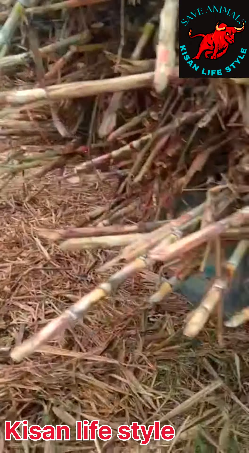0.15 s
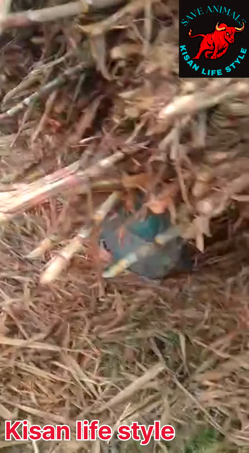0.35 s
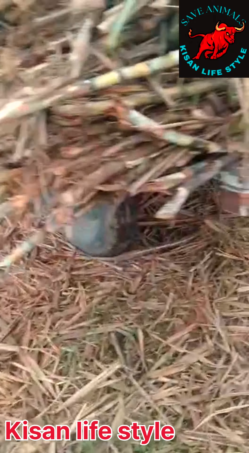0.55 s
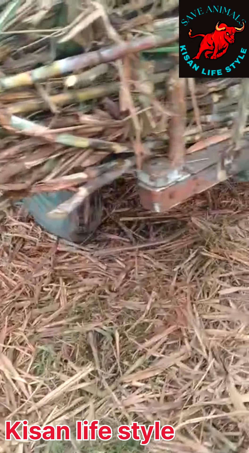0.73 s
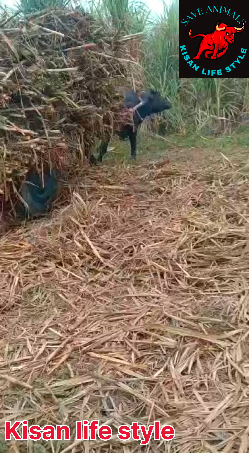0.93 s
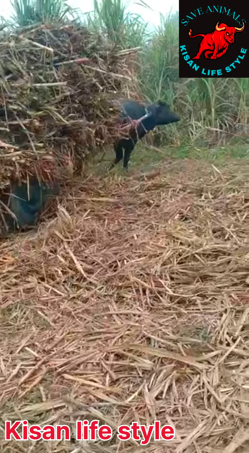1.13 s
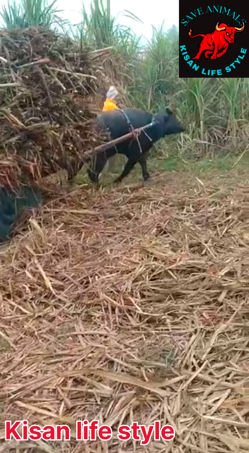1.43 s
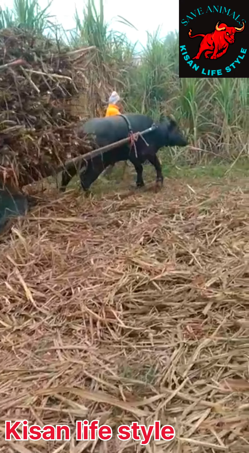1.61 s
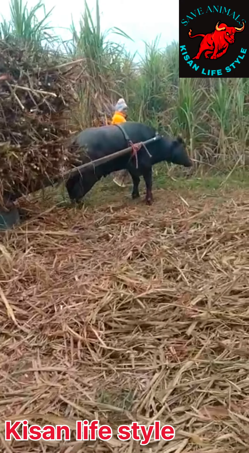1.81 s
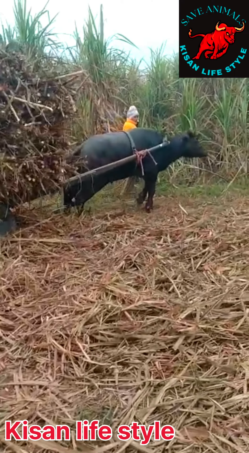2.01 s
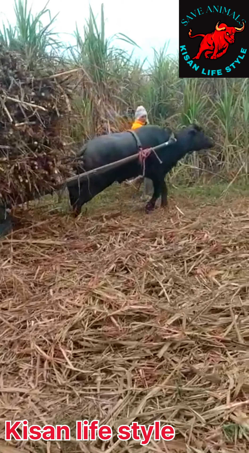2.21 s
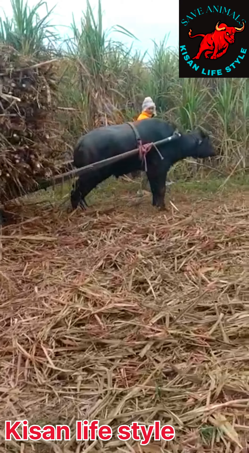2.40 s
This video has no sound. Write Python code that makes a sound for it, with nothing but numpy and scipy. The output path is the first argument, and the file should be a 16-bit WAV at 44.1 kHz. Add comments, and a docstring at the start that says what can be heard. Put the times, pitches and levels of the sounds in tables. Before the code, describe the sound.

Close mono pickup in open air without echo: crisp leaf litter rustles continuously, with a busy flurry of woody thumps and crunches early, a short lull past the middle, then snapping stalks and softer bumps.

```python
"""An open field covered in dry leaves: a loaded cane cart is drawn over it, close by.
Litter: grain noise, hissing and crackling, over a low noise rumble. Load shifts: damped sine thuds with
bursts of crushed-leaf grains. Stalk snaps: short woody and bright noise bursts. Slow crushes: grain
clumps of changing level. Cane rasps: noise bursts, each round one resonance."""
import sys
import numpy as np
from scipy.fft import rfft, irfft, next_fast_len
from scipy.io import wavfile
from scipy.ndimage import uniform_filter1d, map_coordinates

SR = 44100
rng = np.random.default_rng(int(sys.argv[2]) if len(sys.argv) > 2 else 0)


def to_wav(sig):
    """Store sig (one row per channel, or 1-D mono) as 16-bit WAV at the path in sys.argv[1].

    Samples outside -1..1 are clipped; the rate is SR.
    """
    pcm = np.clip(np.atleast_2d(sig), -1, 1) * 32767
    pcm = np.round(pcm).astype(np.int16)
    wavfile.write(sys.argv[1], SR, pcm.T)  # frames by channels


N = 112454

# Level curves. Each row: time in seconds, level in dB before the layer's gain and wobble.
HISS_LEVEL = [(0.0, -40.5), (0.44, -48.5), (0.6, -46), (0.68, -49), (0.79, -53), (0.82, -44), (0.88, -39.5),
              (0.9, -45), (1.06, -52.5), (1.26, -40), (1.58, -41.5), (1.61, -48), (1.67, -46), (1.7, -48.5),
              (2.01, -45.5), (2.035, -39), (2.15, -44), (2.31, -44.5), (2.34, -49.5), (2.43, -49),
              (2.52, -44), (2.55, -47)]  # leaf hiss, also drives the fizz
DRAG_LEVEL = [(0.0, -42.5), (0.26, -50), (0.37, -63), (0.45, -46), (0.77, -53.5), (0.86, -39), (0.9, -50),
              (1.29, -45.5), (1.48, -42), (1.67, -45.5), (1.87, -48.5), (2.07, -42.5), (2.395, -47.5),
              (2.42, -53), (2.55, -47)]  # dragged litter, also drives the leaf ticks
RUMBLE_LEVEL = [(0, -50), (.16, -36), (.24, -51), (.38, -44.5), (.50, -48.5), (.64, -50), (.75, -54.5),
                (1.05, -39.5), (1.18, -57.5), (1.40, -61.5), (1.58, -38.5), (1.70, -58.5), (1.87, -46.5),
                (2.0, -40), (2.3, -50), (2.43, -65), (2.55, -39.5)]
# Spectra of the litter. Each row: frequency in Hz, relative level in dB.
HISS_SPECTRUM = [(2000, -1), (4000, -6), (5200, -4), (6300, -1.5), (7400, 3.5), (7900, 1), (8500, 3.5),
                 (9800, -3), (11500, -7.5), (13000, -6.5), (16000, -12)]
FIZZ_SPECTRUM = [(9000, -44), (11500, -10), (13000, -4), (14800, 4.5), (16000, 1.5)]
DRAG_SPECTRUM = [(60, -40), (250, 4.5), (500, -1), (900, 4.5), (1400, -3.5), (2200, -1), (3000, -4),
                 (4000, -13.5), (6000, -26), (12000, -21)]
RUMBLE_SPECTRUM = [(20, -58), (55, -49), (90, 6), (160, 4), (250, 4), (330, 1.5), (430, -8), (600, -17),
                   (1200, -28.5)]
HISS_GAIN_DB, FIZZ_GAIN_DB, DRAG_GAIN_DB, TICKS_GAIN_DB, RUMBLE_GAIN_DB = 0.5, 1.5, -1.5, -7, 4.5
HISS_GRAINS_PER_S, DRAG_GRAINS_PER_S, TICKS_PER_S = 26000, 4000, 90
HISS_WOBBLE_DB, FIZZ_WOBBLE_DB, DRAG_WOBBLE_DB, RUMBLE_WOBBLE_DB = 1.32, 1, 1.4, 0.72

# Knocks of the shifting load. Each row: start in seconds, thud pitch in Hz, thud level in dB,
# thud T60 in seconds, crunch level in dB, crackle level in dB (levels before the common gains).
KNOCKS = [(.017, 350, -21.5, 0.034, -36, -61), (.049, 304, -30, 0.14, -28, -54),
          (0.081, 196, -22.5, 0.13, -26.5, -42), (.099, 211, -8, 0.046, -24, -38),
          (.135, 210, -24, 0.054, -26, -32), (.144, 208, -12.5, 0.047, -21, -38),
          (.168, 295, -19, 0.044, -40, -42), (0.2693, 387, -8, 0.04, -26.5, -30),
          (.290, 356, -10, 0.035, -22.5, -34), (0.299, 228, -24, 0.047, -25, -33.5),
          (0.3437, 206, -25, 0.051, -26.5, -31), (0.355, 248, 0, 0.014, -29.5, -50),
          (0.39, 375, -31.5, 0.22, -35.5, -43.5), (.419, 210, -4, 0.02, -21, -30),
          (0.442, 389, -23, 0.11, -32.5, -60), (0.522, 393, -34.5, 0.16, -38, -54),
          (.584, 334.3, -24.5, 0.15, -27.5, -32.5), (0.595, 186, -14, 0.083, -32, -54),
          (0.851, 356, -14, 0.051, -48, -53), (0.875, 297, -3, 0.016, -38, -35.5),
          (0.9207, 290, -22.5, 0.046, -30.5, -45.5), (0.954, 215, -29.5, 0.12, -31, -50),
          (0.9824, 266, -35, 0.1, -29, -50), (1.005, 204, -29, 0.1, -30.5, -41),
          (1.021, 259, -14.5, 0.051, -30, -41), (1.09, 337, -29, 0.047, -49, -37.5),
          (1.109, 212, -24.5, 0.056, -35, -47), (1.215, 313, -37.5, 0.061, -59, -62),
          (1.513, 269, -16, 0.049, -39, -57), (1.541, 285, -15, 0.056, -30, -40),
          (1.578, 290, -17.5, 0.035, -35.5, -46), (1.741, 265, -17, 0.051, -41.5, -53),
          (1.799, 248, -20, 0.046, -34, -40.5), (1.914, 265, -19.5, 0.055, -35, -41),
          (1.933, 255, -15, 0.027, -43, -41.5), (1.980, 232, -20, 0.047, -32.5, -47.5),
          (2.042, 254, -24, 0.094, -50, -43), (2.102, 241, -25, 0.065, -58, -55),
          (2.176, 251.6, -13.5, 0.068, -40, -36.5), (2.241, 242, -24.5, 0.063, -44, -58),
          (2.286, 258, -24.5, 0.089, -44, -53), (2.35, 278, -25, 0.078, -38.5, -43.5),
          (2.499, 230, -21, 0.062, -48.5, -43.5)]
# Partials of a thud. Each row: ratio to the pitch, relative level in dB.
THUD_MODES = [(0.662, -9.5), (1.002, 1), (1.6, -20.5)]
# Crushed-leaf spectra, dull and bright. Each row: frequency in Hz, relative level in dB.
CRUNCH_SPECTRUM = [(60, -42), (125, 0), (250, -2.5), (430, 2), (570, -10), (700, -3), (800, -6),
                   (950, -2.5), (1250, -18), (2000, -26), (4000, -72)]
CRACKLE_SPECTRUM = [(500, -31), (1200, 1), (1700, 3), (2100, 0.5), (2750, -5.5), (3400, -13.5),
                    (4500, -25.5), (7500, -14), (10000, -20.5), (16000, -33)]
THUD_RISE_S, THUD_LAG_S, THUD_GAIN = 0.0036, .001, 1.53
CRUNCH_RISE_S, CRUNCH_T60_S, CRACKLE_T60_S = 0.0016, 0.081, 0.068
CRUNCH_GAIN_DB, CRACKLE_GAIN_DB, CRUNCH_GRAINS_PER_S = 6, 5.5, 4000

# Snapping stalks. Each row: start in seconds, woody crack level in dB, bright tick level in dB, T60 in seconds.
SNAPS = [(0.141, -49, -27, 0.013), (0.319, -21, -20.5, 0.0051), (0.4139, -24.5, -20, 0.0094),
         (1.4325, -26, -33, 0.026), (1.573, -13.5, -21, 0.0084), (1.6567, -11.5, -21.5, 0.012),
         (1.8863, -30, -30.5, 0.038), (1.8977, -22.5, -25, 0.013), (2.024, -31.5, -36, 0.016),
         (2.0677, -12, -21.5, 0.007), (2.104, -21, -23.5, 0.0058)]
# Snap spectra. Each row: frequency in Hz, relative level in dB.
CRACK_SPECTRUM = [(80, -11), (280, -7), (900, -12), (1750, 1), (2300, -6), (2900, -1.5), (3950, -10.5),
                  (4450, -15), (5200, -10), (9000, -31), (16000, -50)]
TICK_SPECTRUM = [(2000, -50), (4300, -20), (5300, -8), (6400, -1), (7400, 10), (8500, -18), (16000, -24)]
SNAP_RISE_S = 0.00066

# Slow crushes. Each row: start in seconds, end in seconds, final level in dB before the stop,
# level change from start to end in dB.
CRUSHES = [(0.427, 0.487, -36.5, -2), (0.777, 0.823, -37, 7), (0.818, 0.891, -24, 9),
           (0.997, 1.04, -32.5, -1), (1.44, 1.564, -29.5, 10), (1.998, 2.07, -35.5, -2),
           (2.468, 2.547, -38, 8)]
CRUSH_RISE_S, CRUSH_STOP_S, CRUSH_GRAINS_PER_S = 0.0061, .002, 1800

# Canes slipping against each other. Each row: start in seconds, resonance in Hz, level in dB.
CLACKS = [(.811, 3260, -39), (0.9207, 1680, -37), (0.953, 1670, -35.5), (0.9817, 1680, -35),
          (1.018, 1700, -33), (1.09, 810, -25.5), (1.913, 1600, -32.5), (2.002, 1180, -34),
          (2.014, 1400, -35), (2.176, 670, -35)]
CLACK_T60_S, CLACK_SKIRT_DB = 0.071, 48  # skirt: drop one octave either side

LOW_CUT_HZ, TOP_HZ = 130, 15830


def amp(db):
    """Decibels to gain."""
    return 10 ** (np.asarray(db) / 20)


def unit(x):
    """Scale to rms 1."""
    return x / np.sqrt(np.mean(x ** 2) + 1e-20)


def curve(rows):
    """One value per sample from (seconds, value) rows."""
    return np.interp(np.arange(N) / SR, *np.transpose(rows))


def wobble(knots_per_s):
    """Smooth random curve through normal knots."""
    knots = rng.standard_normal(int(N * knots_per_s / SR) + 4)
    return map_coordinates(knots, [np.arange(N) * knots_per_s / SR])


def colour(x, points):
    """Shape by (Hz, dB) points on a log-frequency axis; rms 1."""
    point_hz, point_db = np.transpose(points)
    hz = np.fft.rfftfreq(len(x), 1 / SR)
    gain = amp(np.interp(np.log(hz + 1), np.log(point_hz + 1), point_db))
    return unit(irfft(rfft(x) * gain, len(x)))


def grains(size, per_s):
    """Tiny fractures at random moments with random strengths; at SR per second, white noise."""
    return rng.standard_normal(size) * (rng.random(size) < per_s / SR)


def strike(t, rise_s, t60_s):
    """Quick rise times exponential decay."""
    return (1 - np.exp(-(t / rise_s) ** 2)) * amp(-60 * t / t60_s)


def burst(spectrum, envelope, per_s):
    """Clump of fractures, evened over 4 ms, with the energy of its envelope."""
    x = colour(grains(len(envelope), per_s), spectrum)
    local_power = np.abs(uniform_filter1d(x ** 2, size=SR // 250))
    x = x * envelope / np.sqrt(local_power + .1)
    return x * np.linalg.norm(envelope) / (np.linalg.norm(x) + 1e-12)


def add(out, start_s, x):
    """Mix x into out at a time, cut at the end of out."""
    part = out[max(round(start_s * SR), 0):][:len(x)]
    part += x[:len(part)]


def litter():
    """Dragged leaves: dense hiss, fine fizz, coarser rustle, single leaves breaking, low rumble."""
    hiss_db = curve(HISS_LEVEL) + HISS_WOBBLE_DB * wobble(90)
    fizz_db = hiss_db + FIZZ_GAIN_DB + FIZZ_WOBBLE_DB * wobble(18)
    drag_db = curve(DRAG_LEVEL) + DRAG_GAIN_DB + DRAG_WOBBLE_DB * wobble(90)
    ticks_db = curve(DRAG_LEVEL) + TICKS_GAIN_DB
    rumble_db = curve(RUMBLE_LEVEL) + RUMBLE_GAIN_DB + RUMBLE_WOBBLE_DB * wobble(39.74)
    hiss = colour(grains(N, HISS_GRAINS_PER_S), HISS_SPECTRUM) * amp(hiss_db + HISS_GAIN_DB)
    fizz = colour(grains(N, HISS_GRAINS_PER_S), FIZZ_SPECTRUM) * amp(fizz_db)
    drag = colour(grains(N, DRAG_GRAINS_PER_S), DRAG_SPECTRUM) * amp(drag_db)
    ticks = colour(grains(N, TICKS_PER_S), CRACKLE_SPECTRUM) * amp(ticks_db)
    rumble = colour(rng.standard_normal(N), RUMBLE_SPECTRUM) * amp(rumble_db)
    return hiss + fizz + drag + ticks + rumble


def knocks():
    """Each load shift: a thud of damped modes, a dull leaf crunch and a brighter crackle."""
    out, t = np.zeros(N), np.arange(SR // 6) / SR
    crunch_envelope = strike(t, CRUNCH_RISE_S, CRUNCH_T60_S)
    crackle_envelope = strike(t, CRUNCH_RISE_S, CRACKLE_T60_S)
    for start_s, hz, thud_db, t60_s, crunch_db, crackle_db in KNOCKS:
        # each mode starts at a random phase
        ring = sum(amp(db) * np.sin(2 * np.pi * (hz * ratio * t + rng.random())) for ratio, db in THUD_MODES)
        thud = amp(thud_db) * THUD_GAIN * ring * strike(t, THUD_RISE_S, t60_s)
        crunch = burst(CRUNCH_SPECTRUM, crunch_envelope, CRUNCH_GRAINS_PER_S)
        crackle = burst(CRACKLE_SPECTRUM, crackle_envelope, CRUNCH_GRAINS_PER_S)
        add(out, start_s + THUD_LAG_S, thud)
        add(out, start_s, amp(crunch_db + CRUNCH_GAIN_DB) * crunch)
        add(out, start_s, amp(crackle_db + CRACKLE_GAIN_DB) * crackle)
    return out


def snaps():
    """A dry stalk breaks: woody crack and bright tick under one fast-decaying envelope."""
    out, t = np.zeros(N), np.arange(SR // 20) / SR
    for start_s, crack_db, tick_db, t60_s in SNAPS:
        envelope = strike(t, SNAP_RISE_S, t60_s)
        crack = amp(crack_db) * burst(CRACK_SPECTRUM, envelope, SR)
        tick = amp(tick_db) * burst(TICK_SPECTRUM, envelope, SR)
        add(out, start_s, crack + tick)
    return out


def crushes():
    """A weight rolls onto the leaves: crunching grows or eases steadily in dB, then stops."""
    out = np.zeros(N)
    for start_s, end_s, final_db, change_db in CRUSHES:
        t = np.arange(max(round((end_s - start_s) * SR), 256)) / SR
        edges = np.minimum(1, np.minimum(t / CRUSH_RISE_S, (t[-1] - t) / CRUSH_STOP_S))
        level_db = final_db + change_db * (t / t[-1] - 1)
        add(out, start_s, burst(CRUNCH_SPECTRUM, edges * amp(level_db), CRUSH_GRAINS_PER_S))
    return out


def clacks():
    """Canes slip against each other; each rasps briefly at its own resonance."""
    out, t = np.zeros(N), np.arange(SR // 10) / SR
    envelope = strike(t, CRUNCH_RISE_S, CLACK_T60_S)
    for start_s, hz, db in CLACKS:
        resonance = [(hz / 2, -CLACK_SKIRT_DB), (hz, 0), (hz * 2, -CLACK_SKIRT_DB)]
        add(out, start_s, amp(db) * burst(resonance, envelope, SR))
    return out


def scene():
    """Sum of all sources, one channel; open air, no echo."""
    return (litter() + knocks() + snaps() + crushes() + clacks())[None]


def record(dry):
    """Second-order low cut and a sharp upper band limit."""
    padded = next_fast_len(N + SR // 4)
    hz = np.fft.rfftfreq(padded, 1 / SR)
    low_cut = (hz / LOW_CUT_HZ) ** 2 / np.sqrt(1 + (hz / LOW_CUT_HZ) ** 4)
    return irfft(rfft(dry, padded) * low_cut * (hz < TOP_HZ), padded)[..., :N]


dry = scene()
out = record(dry)
to_wav(out)
```